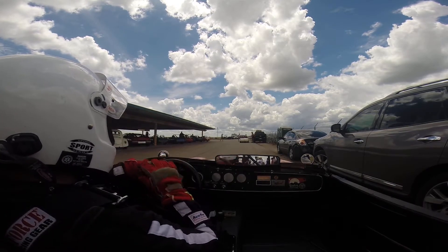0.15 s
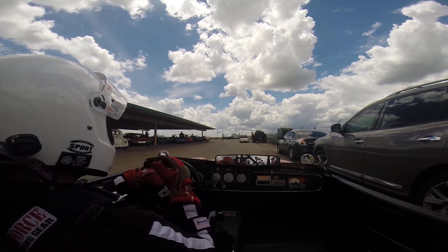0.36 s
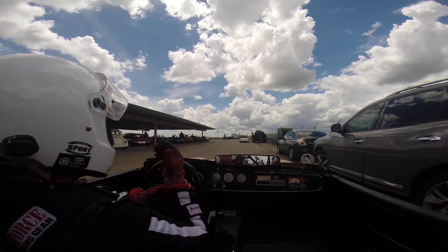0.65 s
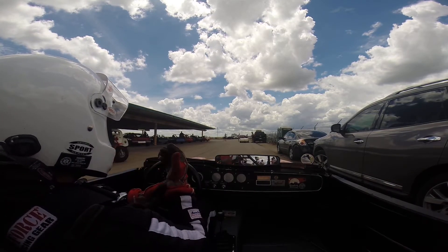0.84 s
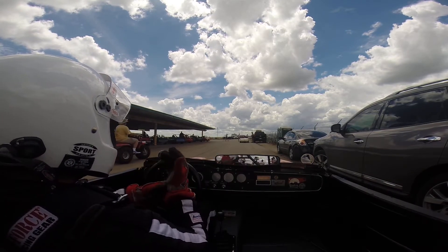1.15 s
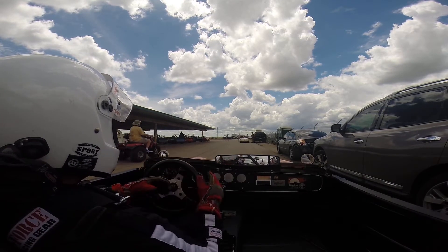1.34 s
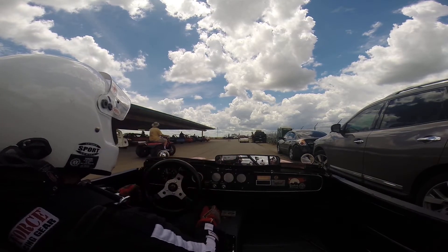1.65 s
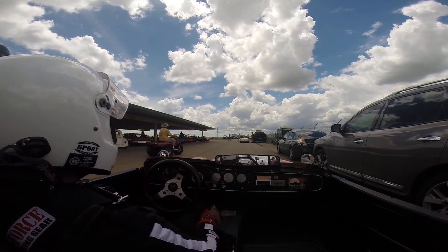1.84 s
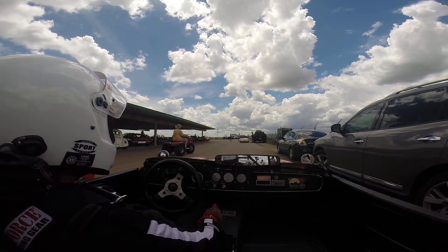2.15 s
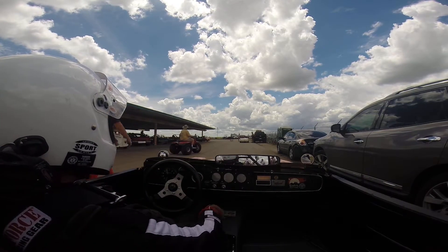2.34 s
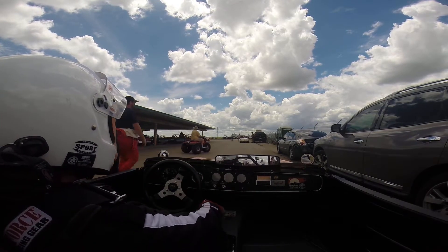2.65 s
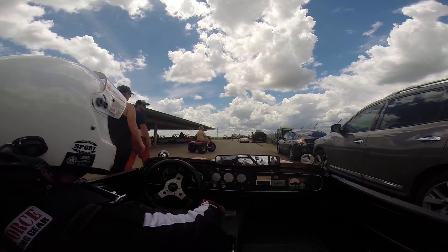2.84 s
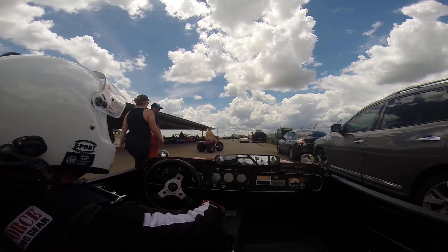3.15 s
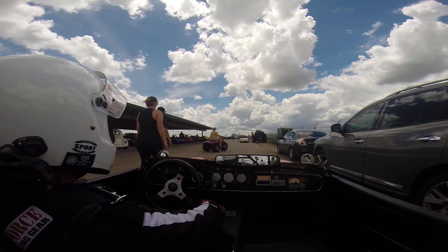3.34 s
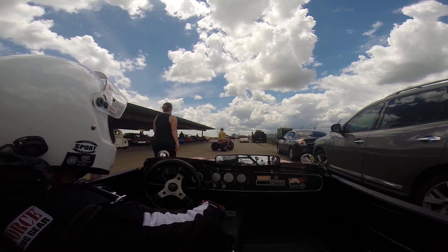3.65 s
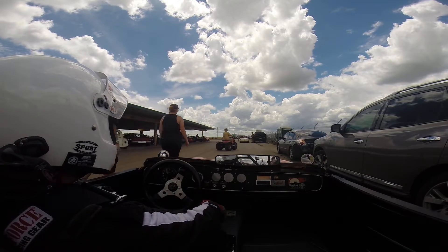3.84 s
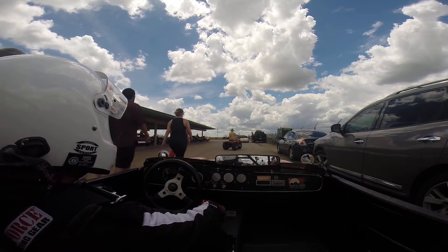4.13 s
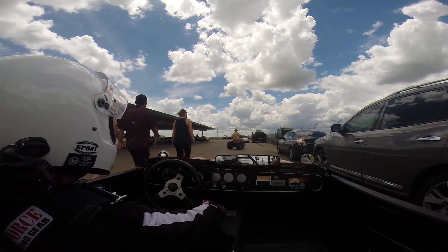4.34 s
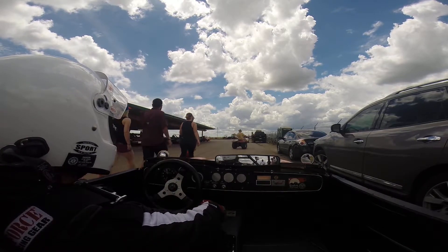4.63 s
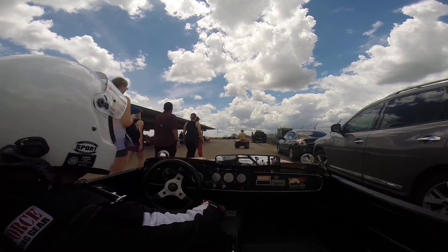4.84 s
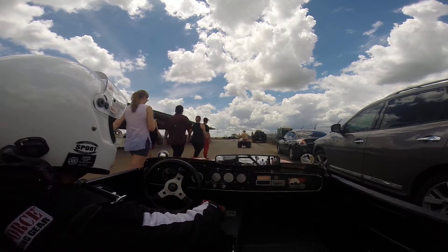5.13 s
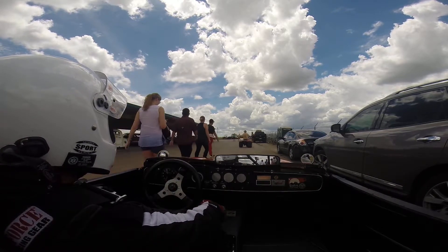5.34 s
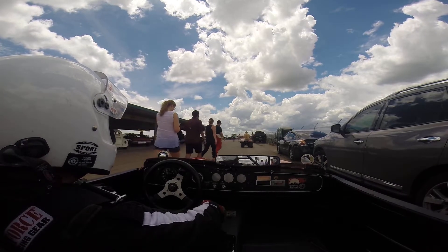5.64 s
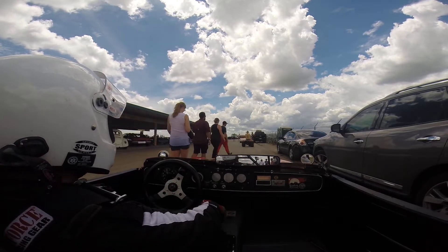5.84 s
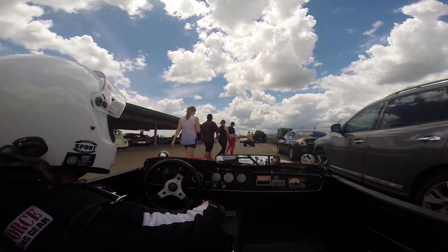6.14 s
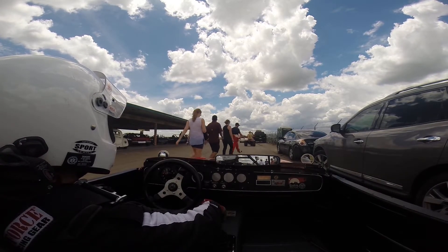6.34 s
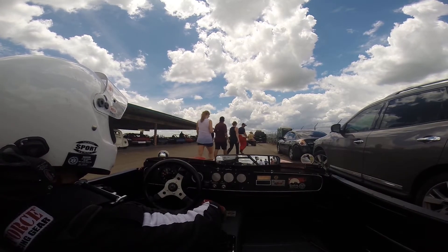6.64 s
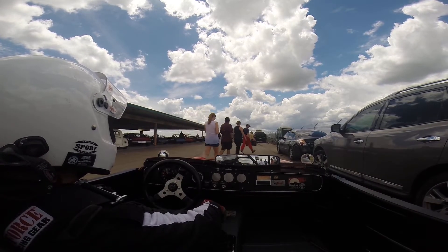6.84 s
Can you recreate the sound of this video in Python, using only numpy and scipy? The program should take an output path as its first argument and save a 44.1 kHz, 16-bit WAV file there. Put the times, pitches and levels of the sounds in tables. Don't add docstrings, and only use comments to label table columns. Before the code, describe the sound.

A rough four-cylinder sports car idles with a deep, uneven boom, sags, catches, and is blipped twice while panels buzz and valves tick alongside.

```python
import sys
import numpy as np
from scipy import signal
from scipy.fft import rfft, irfft, next_fast_len
from scipy.io import wavfile
from scipy.ndimage import uniform_filter1d, map_coordinates

SR = 44100
rng = np.random.default_rng(int(sys.argv[2]) if len(sys.argv) > 2 else 0)


def linear_from_db(decibels):
    return 10 ** (np.asarray(decibels, float) / 20)


def inscribe(sig):
    pcm = np.round(np.clip(np.atleast_2d(sig).T, -1, 1) * 32767)
    wavfile.write(sys.argv[1], SR, pcm.astype(np.int16))


N = 308259


def unit(x):
    return x / np.sqrt(np.mean(x ** 2) + 1e-20)


def along(points, hz):
    f, v = np.transpose(points)
    return np.interp(np.log(hz + 1), np.log(f + 1), v)


def curves(rows):
    s, *cols = np.transpose(rows)
    return [np.interp(np.arange(N) / SR, s, c) for c in cols]


def wobble(knots_per_s):
    knots = rng.standard_normal(int(N * knots_per_s / SR) + 4)
    return map_coordinates(knots, [np.arange(N) * knots_per_s / SR])


def filtered(x, response):
    m = next_fast_len(N + SR // 2)
    return unit(irfft(rfft(x, m) * response(np.fft.rfftfreq(m, 1 / SR)), m)[:N])


def mode(hz, width_hz):
    return lambda f: 1j * f * width_hz / (hz * hz - f * f + 1j * f * width_hz)


def spells(rows, shape):
    t = np.arange(N) / SR
    return sum(shape(t - s, *rest) for s, *rest in rows)


def struck(events, modes, spread_db):
    rise_cycles = 1.5
    out, t = np.zeros(N + SR), np.arange(SR // 20) / SR
    mix = rng.standard_normal((len(events), len(modes)))
    for (s, db), chances in zip(events, mix):
        for (hz, level_db, t60_s), chance in zip(modes, chances):
            decay = linear_from_db(db + level_db + spread_db * chance - 60 * t / t60_s)
            rise = 1 - np.exp(-t * hz / rise_cycles)
            out[round(s * SR):][:len(t)] += decay * np.sin(2 * np.pi * hz * t) * rise
    return out[:N]


def beats(turns):
    return np.diff(np.floor(turns), prepend=0).clip(0)


def firings(turns, scatter_db, weak_db):
    size_db = scatter_db * rng.standard_normal(400) + weak_db * (np.arange(400) % 2)
    return linear_from_db(size_db[turns.astype(int)])


def puffs(turns, size, lag, life, rest):
    u = (turns + lag) % 1
    burst = size * np.exp(-u / life) * (1 - np.exp(-u / .03))
    return (burst + rest) * rng.standard_normal(N)


def crank_speed():
    # time in seconds, firing rate in Hz.
    speed = [(0, 35.54), (1.62, 35.1), (1.85, 31.06), (2.5, 30.82), (2.63, 34.7), (2.77, 46.75),
             (2.94, 38.41), (3.1, 35.01), (4.6, 35.2), (4.95, 31.48), (5.45, 31), (5.62, 48), (5.67, 29.61),
             (5.84, 29.58), (5.95, 45.46), (6.12, 61.55), (6.22, 71.62), (6.3, 69.45), (6.68, 52.62),
             (6.99, 40.4)]
    return curves(speed)[0]


def engine_load():
    # time in seconds, load in dB.
    load = [(0, 1), (1.7, 0), (2.45, 8), (2.52, 4.5), (2.62, 11), (2.74, -1), (2.83, -1), (4.74, -1),
            (5.02, 3.5), (5.53, 7), (5.62, 6), (5.84, 4.5), (5.94, 2), (6.13, 9.5), (6.22, 11.5),
            (6.26, 1.5), (6.34, 1.8), (6.99, 1)]
    # time in seconds, jolt in dB.
    jolts = [(0.886, 0), (1.18, 5), (1.889, 3.5), (2.704, 5), (3.01, 2.5), (3.15, 3), (3.783, 4),
             (4.0, 1.5), (3.27, -2.5), (3.62, 4), (4.18, 1.5), (4.4, 4), (4.786, 3), (5.6, 1.5),
             (5.845, 3.5), (6.42, 3)]
    rise_s, settle_s = .006, 0.094

    def jolt(t, db):
        return db * np.clip(t / rise_s, 0, 1) * np.exp(-abs(t) / settle_s)

    cut_s, cut_length_s, cut_db, fall_s, back_s = 5.625, .19, 17, 0.06, 0.06
    t = np.arange(N) / SR - cut_s
    cut = cut_db * np.clip(np.minimum(t / fall_s, (cut_length_s - t) / back_s), 0, 1)
    return curves(load)[0] + spells(jolts, jolt) - cut


def stumbles():
    # time in seconds, half length in seconds, loss of orders 1, 2 and 3 in dB (under 0 a swell).
    weak_spells = [(0.02, 0.09, 4, 13.5, 14), (.5, 0.05, -3, 0, 0), (1.0, .07, 12, 5, 22),
                   (1.66, 0.081, 10, 12.5, 4.5), (1.78, 0.077, 15, 30, 3), (1.88, 0.057, 5, 18, 12.5),
                   (2.1, 0.096, 6, 25, -2), (2.4, 0.056, 5, 7, 8.5), (2.66, 0.055, 3, 0.5, -7),
                   (2.92, 0.15, 8, 7.5, 11), (3.43, 0.13, 16, 9, 6), (3.65, 0.03, 6, 18, 9.5),
                   (4.68, 0.095, 16, 21, 10), (4.87, 0.11, 12, 22, -4.5), (4.92, 0.034, 9, 4, 15.5),
                   (5.15, 0.13, 6, 13, -1.5), (5.56, 0.032, 1, 10.5, -11), (5.95, 0.067, 8, 4.5, 12.5),
                   (6.38, 0.044, 3, 1, 1.5), (6.57, 0.084, 1, 8.5, 2), (6.68, 0.073, 5, -10, 3),
                   (6.8, 0.068, 12, 7, 5), (6.9, 0.078, 15, 6, 7), (6.97, 0.06, 12, -6, 13)]
    return spells(weak_spells, lambda t, half_s, *db: np.outer(db, np.clip(1 - abs(t) / half_s, 0, 1)))


def exhaust_levels(firing_hz, load_db, lost_db):
    # firing rate in Hz, level of orders 1, 2 and 3 in dB, growl change in dB.
    orders_at = [(28.8, -39.5, -13.5, -36, 0), (31.2, -34, -11.5, -23, 0), (35.2, -25, -16, -16.5, 0.4),
                 (37.7, -21.5, -11.5, -29.5, 1.2), (48, -19.5, -16.5, -30, -1.5),
                 (54, -21.5, -19, -28, 0.5), (65, -23.5, -23.5, -42.5, 5), (70.5, -26, -18.5, -25.5, 3)]
    speeds, *levels = np.transpose(orders_at)
    first, second, third, favour_db = (np.interp(firing_hz, speeds, db) for db in levels)
    orders_db = [first + 0.6 * load_db - lost_db[0], second - lost_db[1], third - lost_db[2]]
    return orders_db, -25.5 + 0.87 * load_db + favour_db - 0.11 * lost_db[2]


def crank(firing_hz):
    # time in seconds, cylinder (0 strong, 1 weak).
    fired = [(0.207, 0), (0.459, 1), (0.798, 1), (1.147, 1), (1.487, 1), (3.063, 1), (3.26, 0), (3.611, 0),
             (3.895, 0), (4.206, 1), (4.548, 1)]
    turns = np.cumsum(firing_hz) / SR
    s, weak = np.transpose(fired)
    slip = np.unwrap((weak - turns[(s * SR).astype(int)] + 1) % 2 - 1, period=2)
    slip = np.interp(np.arange(N) / SR, s, slip)
    return 2 + turns + uniform_filter1d(slip, size=SR // 10)


def exhaust(turns, firing_hz, orders_db, growl_db):
    # frequency in Hz, level in dB per Hz.
    pipe_points = [(76, -40.5), (130, -7.5), (135, -2.5), (162, -4), (189, -9), (207, -5), (243, 3),
                   (259, -1), (275, -12), (297, -8), (322, -20), (354, -10.5), (427, -11), (521, -20),
                   (580, -20.5), (750, -28.5), (1280, -120)]
    low = 0
    for k, db, lag_rad in zip((1, 2, 3), orders_db, (1.9, 2., 2.1)):
        low = low + linear_from_db(db + 3 + 1.5 * wobble(14)) * np.cos(2 * np.pi * k * turns - lag_rad)
    even = np.clip((firing_hz - 36) / 20, 0, 1)
    uneven = turns + (.012 - .007 * even) * wobble(30)
    echo = 0.55 * even * beats(uneven + .5)
    size = firings(turns, scatter_db=-0.64, weak_db=-3.0)
    blows = (beats(uneven) + echo) * size * np.sqrt(35 / firing_hz)

    def pipe(f):
        return linear_from_db(along(pipe_points, f))

    def silencer(f):
        return np.exp(-1j * np.pi * .016 * f * f / 600)

    pulses = filtered(blows, lambda f: pipe(f) * silencer(f))
    rush = filtered(puffs(turns, 1.0, lag=0.63, life=0.54, rest=0.84), pipe)
    growl = (.72 - .3 * even) * pulses + (.63 - .2 * even) * rush
    return low + linear_from_db(growl_db) * growl, blows * even


def singing(turns, firing_hz, load_db):
    # frequency in Hz, level in dB.
    sing_at = [(150, -36), (205, -34), (248, -17.5), (300, -39), (410, -27.5), (465, -38.5), (540, -32.5),
               (700, -48)]
    # order, level in dB.
    upper_orders = [(4, 4.5), (5, -6), (6, -3), (7, -2.5), (8, -1), (9, -7.5), (10, -5), (12, -6)]
    fast = np.clip((firing_hz - 36.5) / 9, 0, 1)
    out = 0
    for k, db in upper_orders:
        level_db = db + along(sing_at, k * firing_hz) + .75 * (load_db - 4) + 2.2 * wobble(14)
        out = out + linear_from_db(level_db) * np.cos(2 * np.pi * k * turns + k * k + .05 * k * wobble(25))
    return fast * out


def buzz_level(load_db):
    # start in seconds, length in seconds, level over rest in dB.
    buzzes = [(0.06, 0.046, 17), (.3, 0.34, 5), (0.62, 0.27, 13.5), (1.15, 0.28, 9), (1.45, 0.12, 8),
              (1.89, 0.38, 4), (2.68, 0.15, 10.5), (2.99, 0.057, 14), (3.14, 0.1, 14.5), (3.8, .42, 13),
              (4.35, 0.049, 14), (4.5, 0.12, 10), (6.12, 0.09, -1)]
    rest_db, edge_s = -64.5, 0.035

    def buzz(t, length_s, db):
        return db * np.clip(np.minimum(t, length_s - t) / edge_s + .5, 0, 1)

    return rest_db + load_db + spells(buzzes, buzz)


def rattle(turns, size, clear_blows, panel_db, wall_db, ring_db):
    # frequency in Hz, level in dB per Hz.
    slope = [(260, -10.5), (450, -1.5), (523, -14), (618, -1), (706, -26.5), (774, -1.5), (869, -6.5),
             (937, -8.5), (1020, -6), (1290, -20), (1570, -4.5), (1870, -11.5), (1980, -19), (2720, -18.5),
             (3300, -21.5), (4290, -49.5), (7260, -120)]
    # frequency in Hz, width in Hz, level over the slope in dB.
    panel_modes = [(638.5, 8.3, 11), (826, 2.5, 9), (873, 12, 10.5), (1067, 9.5, -17.5), (1646, 16, 11.5),
                   (1787, 61, 11.5), (1996, 95, 22.5), (2195, 27, 23), (2322, 99, 13), (2514, 90, 12),
                   (2882, 17, 14), (3294, 39, 7.5)]

    def body(f):
        peaks = 1 + sum((linear_from_db(db) - 1) * abs(mode(hz, w)(f)) ** 2 for hz, w, db in panel_modes)
        return linear_from_db(along(slope, f)) * peaks

    def upper(f):
        return 1 / (1 + (1290 / (f + 1)) ** 12)

    shake = unit(puffs(turns, size, lag=0, life=.2, rest=.62))
    taps = unit(beats(turns) * size)
    panels = filtered(shake + .18 * unit(clear_blows), lambda f: body(f) * (1 - upper(f)))
    wall = filtered(shake + 0.1 * taps, lambda f: body(f) * upper(f))
    buzz = unit(puffs(turns, size, lag=0, life=.12, rest=.08))
    high_ring = filtered(buzz + 1.6 * taps, lambda f: mode(4745, 170)(f) ** 2)
    low_ring = filtered(taps + 0.67 * shake, lambda f: mode(2023, 120)(f) ** 2)
    ring = high_ring + linear_from_db(10) * low_ring
    steady_panel_db = -38.5 - 13.5
    return (linear_from_db(panel_db) + linear_from_db(steady_panel_db)) * panels + linear_from_db(wall_db) * wall + linear_from_db(ring_db + 2.0) * ring


def case_raps():
    # time in seconds, peak in dB.
    raps = [(0.0982, -23.5), (0.183, -24), (0.4315, -24.5), (0.6614, -20), (0.7712, -20.5), (0.8864, -17.5),
            (1.2321, -27.5), (1.3179, -20.5), (1.4028, -16.5), (1.4611, -22), (1.8882, -14),
            (2.1346, -17.5), (2.1665, -23), (2.2543, -20.5), (2.3885, -18.5), (2.5152, -25.5),
            (2.5477, -20), (2.5836, -14.5), (2.7038, -17), (3.1483, -22.5), (3.1777, -13.5), (3.2062, -18),
            (3.724, -24.5), (3.7843, -24.5), (3.8382, -22.5), (3.8971, -24), (3.951, -23), (4.0098, -28.5),
            (4.0647, -18.5), (4.377, -26), (4.4633, -21.5), (4.5182, -24), (5.1358, -17), (5.4645, -17.5),
            (5.5992, -21.5), (5.8626, -14.5), (6.0542, -12.5), (6.132, -16.5), (6.1604, -16.5),
            (6.4478, -25)]
    # frequency in Hz, level in dB, t60 in seconds.
    rap_modes = [(1630, -6, .03), (1800, -10.5, .03), (1990, 3, 0.026), (2210, -6.5, 0.053),
                 (840, -7.5, .03), (4840, -19, .02)]
    return struck([(s, db - 8) for s, db in raps], rap_modes, spread_db=3.0)


def intake(turns, size):
    # time in seconds, hiss level in dB.
    throttle = [(0, -47), (1.62, -41), (1.86, -44), (2.04, -41.5), (2.53, -41.5), (2.61, -35.5),
                (2.74, -34.5), (2.8, -49), (4.07, -42), (4.5, -48.5), (5.57, -38.5), (5.63, -42),
                (5.67, -56), (5.76, -59), (5.8, -43), (6.215, -31), (6.27, -46.5), (6.99, -48.5)]
    # frequency in Hz, level in dB per Hz.
    hiss_points = [(1710, -16.5), (2900, -1), (3120, -1), (3340, -1), (3560, -4), (3820, -1.5),
                   (4470, -4.5), (4610, -4), (4830, -2.5), (5210, -12), (5670, -4.5), (6280, -13),
                   (7130, -9.5), (8000, -22), (10400, -51), (17600, -120)]
    # frequency in Hz, level in dB per Hz.
    jet_points = [(6800, -39), (8000, -7), (8800, -11), (9600, -7.5), (10500, -11.5), (12000, -14.5),
                  (13800, -20), (14400, -19), (15200, -64.5)]
    hiss_db, = curves(throttle)
    swirl = wobble(21.88)
    hiss = filtered(puffs(turns, size, lag=0, life=1.0, rest=0.9), lambda f: linear_from_db(along(hiss_points, f)))
    jet = filtered(puffs(turns, size, lag=0, life=.4, rest=0.58), lambda f: linear_from_db(along(jet_points, f)))
    jet_db = -68.0 + 1.1 * (hiss_db + 44) + 2.2 * swirl
    return linear_from_db(hiss_db - 2.0 + 1.0 * swirl) * hiss + linear_from_db(jet_db) * jet


def frame(growl_db):
    # frequency in Hz, level in dB per Hz.
    rumble_points = [(20, -42), (32, -30), (45, -2.5), (70, -3), (90, -0.5), (120, -4.5), (150, -39.5),
                     (250, -84.5)]
    boom = filtered(rng.standard_normal(N), lambda f: mode(58, 9)(f) ** 2)
    rumble = filtered(rng.standard_normal(N), lambda f: linear_from_db(along(rumble_points, f)))
    return linear_from_db(-24.5) * boom + linear_from_db(-25.5 + .6 * (growl_db + 23)) * rumble


def lurches():
    # time in seconds, peak in dB, frequency in Hz.
    lurch_events = [
        (2.72, -1, 51.4),
        (5.59, 1, 59.4),
        (5.99, -20.5, 51.6),
    ]
    rise_s, t60_s = 0.022, 0.54

    def swing(t, db, hz):
        t = t.clip(0)
        return linear_from_db(db - 60 * t / t60_s) * (1 - np.exp(-(t / rise_s) ** 2)) * np.sin(2 * np.pi * hz * t)

    return spells(lurch_events, swing)


def squeak():
    at_s, half_s = 1.625, 0.056
    rub = filtered(rng.standard_normal(N), lambda f: mode(4440, 200)(f) ** 2)
    return linear_from_db(-44.5) * rub * np.exp(-((np.arange(N) / SR - at_s) / half_s) ** 2)


def neighbour():
    # frequency in Hz, level in dB rms.
    hum_tones = [(53.7, -58.5), (107.4, -26.5), (161.1, -39)]
    # time in seconds, turns done.
    cam = [(-0.0376, -5), (1.0031, 9), (1.8255, 20), (2.6458, 31), (3.6937, 45), (4.0697, 50), (4.5137, 56),
           (5.3976, 68), (7.02, 90)]
    # time in seconds, peak in dB.
    valve_reach = [(0, -62), (0.32, -51), (0.8, -56), (1.0, -50), (1.3, -57.5), (2.0, -41.5), (2.65, -53),
                   (2.85, -61), (3.5, -58.5), (3.77, -37.5), (4.1, -49.5), (4.35, -64), (4.55, -47),
                   (5.15, -48.5), (5.36, -36.5), (5.62, -51), (5.7, -49.5), (6.99, -60)]
    valves_db, scatter_db = [-3, -13, -13.5, -5.5], 3.5
    t = np.arange(N) / SR + 0.0024 * wobble(1.5)
    hum = sum(linear_from_db(db + 5.0 + 0.85 * wobble(1.4)) * np.sin(2 * np.pi * hz * t) for hz, db in hum_tones)
    short = np.arange(300) / SR
    bright = signal.butter(2, [7200, 11000], "bandpass", fs=SR, output="sos")
    ticks = np.zeros(N + len(short))
    cam_s, cam_turns = np.transpose(cam)
    for quarter in range(-16, 356):
        s = np.interp(quarter / 4, cam_turns, cam_s)
        db = np.interp(s, *np.transpose(valve_reach)) + valves_db[quarter % 4]
        db = db + scatter_db * min(rng.normal(), 1)
        pitch, level = rng.uniform(size=2)
        high = signal.sosfilt(bright, rng.standard_normal(len(short)) * linear_from_db(-60 * short / 0.0025))
        low = linear_from_db(-9 + 9 * level - 60 * short / .007) * np.sin(2 * np.pi * (5500 + 2300 * pitch) * short)
        ticks[round(s * SR):][:len(short)] += linear_from_db(db + 1.0) * (high / abs(high).max() + low)
    return hum + ticks[:N]


def valve_ticks():
    # time in seconds, snap peak in dB, cover ring in dB.
    clear_ticks = [(0.2599, -49.5, -47), (0.3152, -50, -45.5), (0.335, -48.5, -45.5), (0.5377, -54, -48.5),
                   (0.5567, -54.5, -42.5), (0.7602, -53, -50), (1.0035, -50, -41.5), (1.7325, -44, -45),
                   (1.8063, -45.5, -48), (1.8253, -39.5, -45.5), (1.8816, -45, -44), (1.899, -39, -42.5),
                   (1.954, -43, -43.5), (1.9929, -43, -49), (2.0122, -48.5, -49), (2.03, -43, -42),
                   (2.0493, -41.5, -35), (2.104, -42, -44), (2.1238, -49, -34), (2.1715, -50, -43.5),
                   (2.197, -49, -38.5), (2.2728, -46.5, -44.5), (2.403, -50.5, -42.5), (2.4214, -47, -39),
                   (2.5716, -46, -43), (2.5916, -46.5, -42), (2.6454, -39, -41), (3.4506, -49, -49.5),
                   (3.6751, -51.5, -49), (3.6932, -45.5, -45.5), (3.7499, -43.5, -48.5), (3.7684, -44, -46),
                   (3.8244, -50.5, -48), (3.8435, -48, -48.5), (3.8996, -46, -43.5), (3.9185, -43, -45),
                   (3.9746, -47, -46), (4.0497, -42, -48), (4.0682, -44, -42.5), (4.2722, -51, -45),
                   (4.4947, -53, -50), (4.5134, -46.5, -54), (4.569, -51, -48), (4.587, -44, -38),
                   (4.642, -49, -57), (4.7157, -48.5, -48), (4.7896, -43, -47), (4.8629, -49, -49),
                   (4.8823, -47.5, -45), (4.9367, -49, -48), (4.9555, -46, -48), (5.011, -45, -40.5),
                   (5.3077, -39.5, -33.5), (5.3248, -42.5, -43), (5.3797, -48, -49.5), (5.3994, -44, -46.5),
                   (5.5962, -40.5, -50.5), (6.4857, -50.5, -45.5)]
    # frequency in Hz, level in dB, t60 in seconds.
    cover = [(5700, 1, 0.016), (7040, 1, 0.0094)]
    short, snaps = np.arange(300) / SR, np.zeros(N + SR)
    bright = signal.butter(2, [7400, 11500], "bandpass", fs=SR, output="sos")
    for s, db, _ in clear_ticks:
        noise = rng.standard_normal(len(short))
        snap = signal.sosfilt(bright, noise * linear_from_db(-60 * short / .004))
        snaps[round(s * SR):][:len(short)] += linear_from_db(db + 2.5) * snap / abs(snap).max()
    return snaps[:N] + struck([(s, db + 2) for s, _, db in clear_ticks], cover, spread_db=2)


def scene():
    load_db = engine_load()
    lost_db = stumbles()
    firing_hz = crank_speed() - .05 * lost_db[2]
    over_idle_hz = (firing_hz - firing_hz[0]).clip(0)
    orders_db, growl_db = exhaust_levels(firing_hz, load_db, lost_db)
    turns = crank(firing_hz)
    knocks = turns - .05 + .14 * (1 - np.cos(np.pi * turns)) / 2
    size = firings(knocks, scatter_db=1.0, weak_db=-2.5)
    pipe_sound, clear_blows = exhaust(turns, firing_hz, orders_db, growl_db)
    pipe_sound = pipe_sound + singing(turns, firing_hz, load_db)
    panel_db = -38.5 + 1.29 * load_db
    wall_db = -35.5 + load_db + 0.065 * over_idle_hz
    body = rattle(knocks, size, clear_blows, panel_db, wall_db, buzz_level(load_db)) + case_raps()
    body = body + frame(growl_db - 0.7 * over_idle_hz)
    body = body + lurches() + squeak()
    alongside = neighbour() + valve_ticks()
    return (pipe_sound + body + intake(knocks, size) + alongside)[None]


def low_pass(x):
    return signal.sosfilt(signal.butter(12, 14500, fs=SR, output="sos"), x)


def record(dry):
    soft = dry / (1 + abs(dry / .9) ** 4) ** (1 / 4)
    mix = signal.sosfilt(signal.butter(2, 24, "highpass", fs=SR, output="sos"), soft)
    return low_pass(mix)


dry = scene()
out = record(dry)
inscribe(out)
```